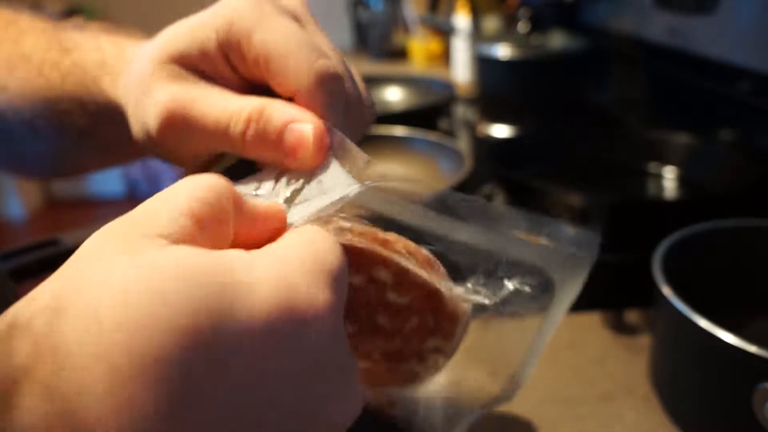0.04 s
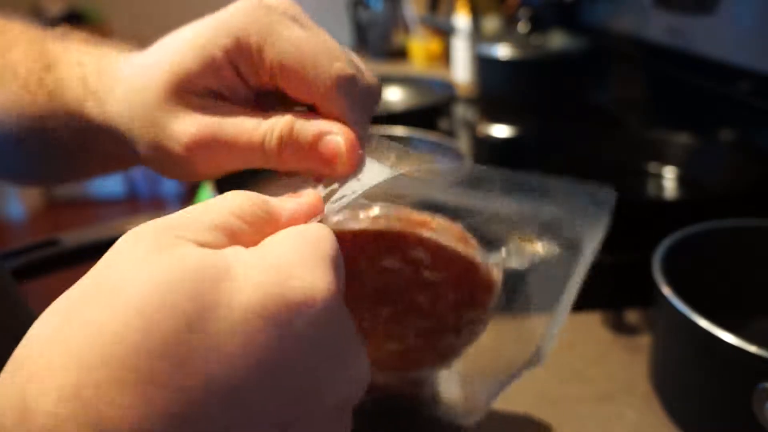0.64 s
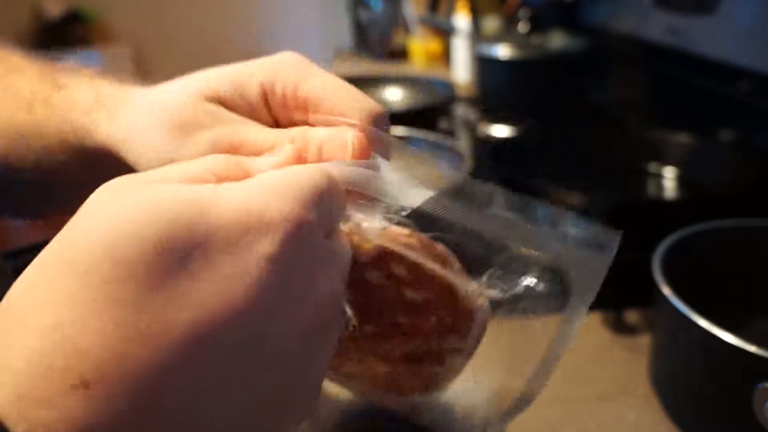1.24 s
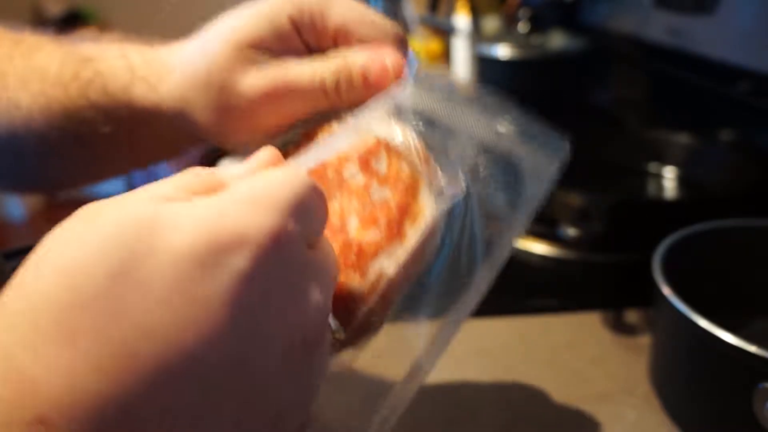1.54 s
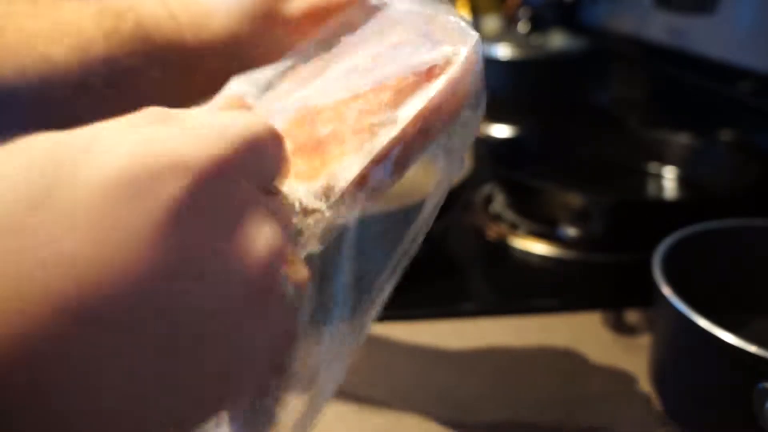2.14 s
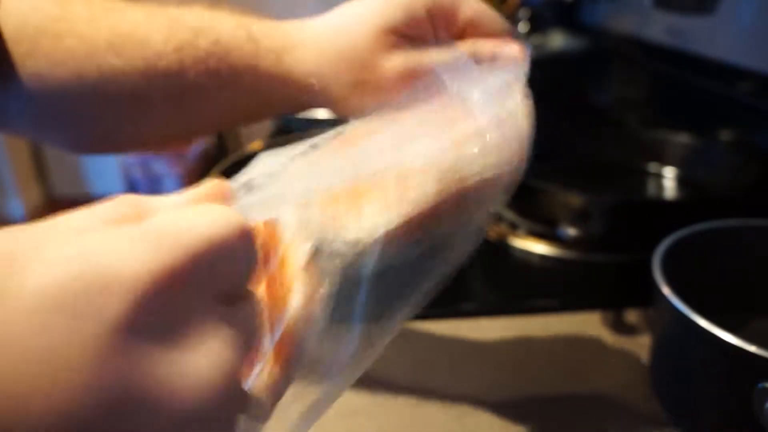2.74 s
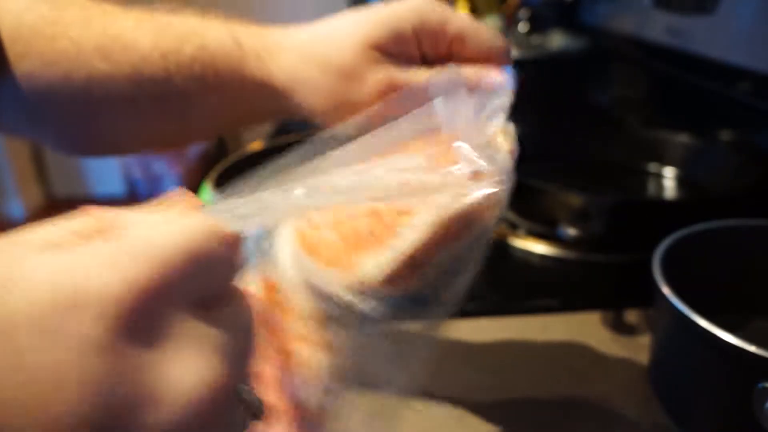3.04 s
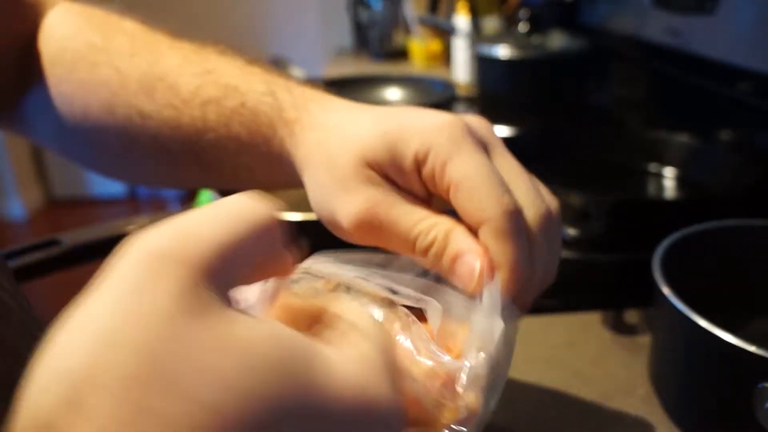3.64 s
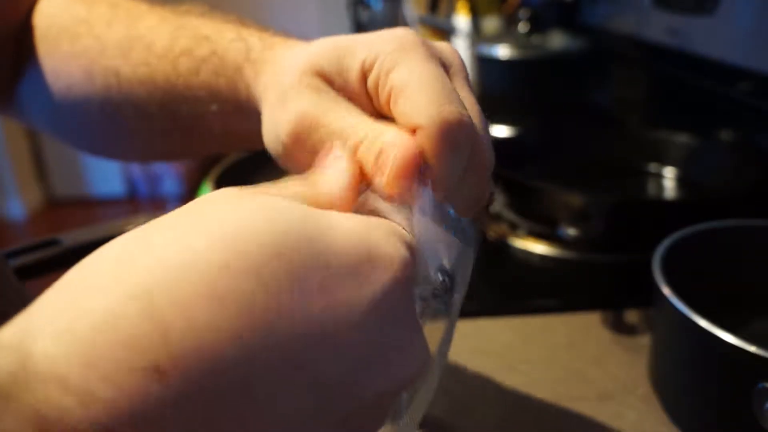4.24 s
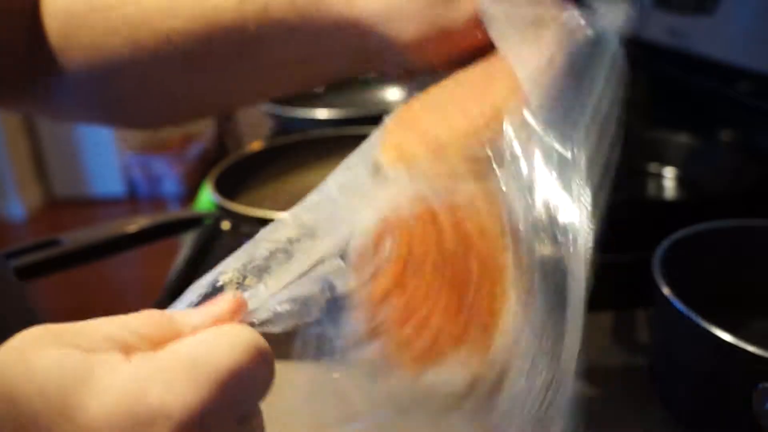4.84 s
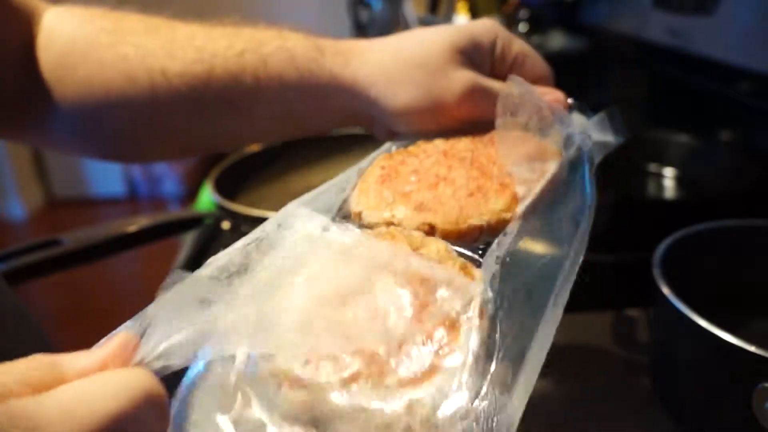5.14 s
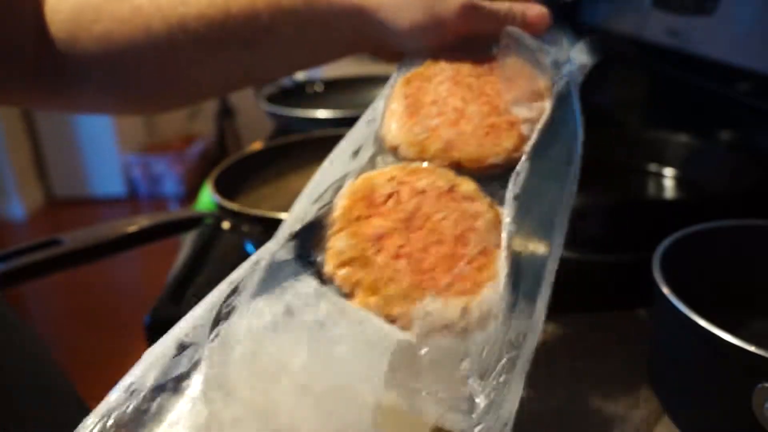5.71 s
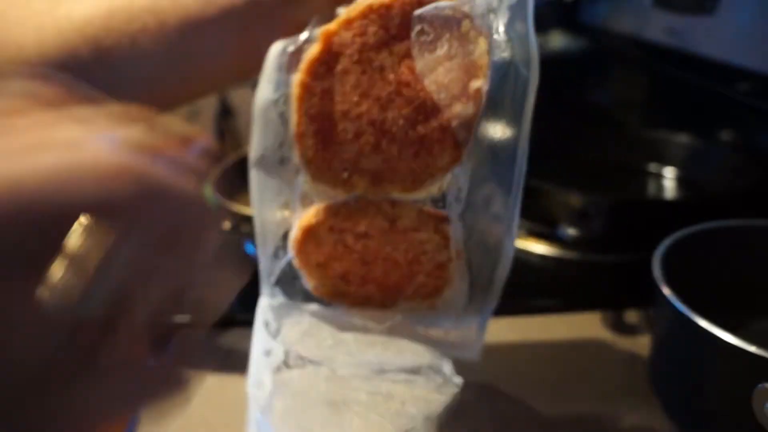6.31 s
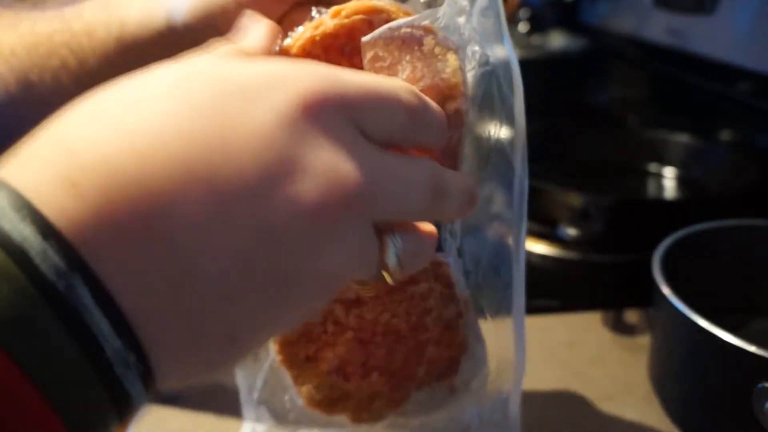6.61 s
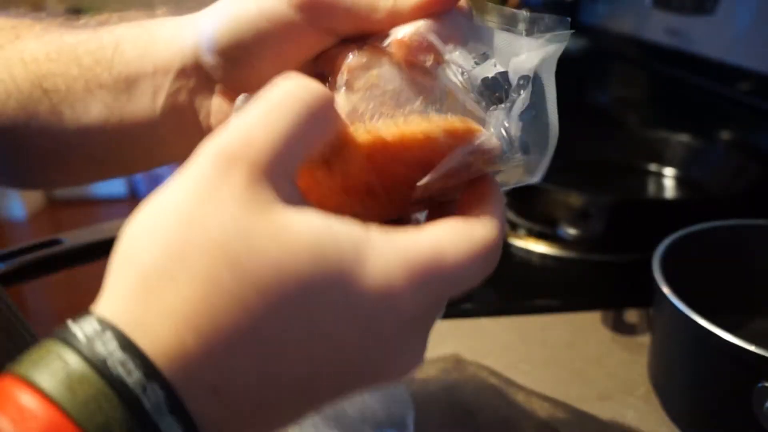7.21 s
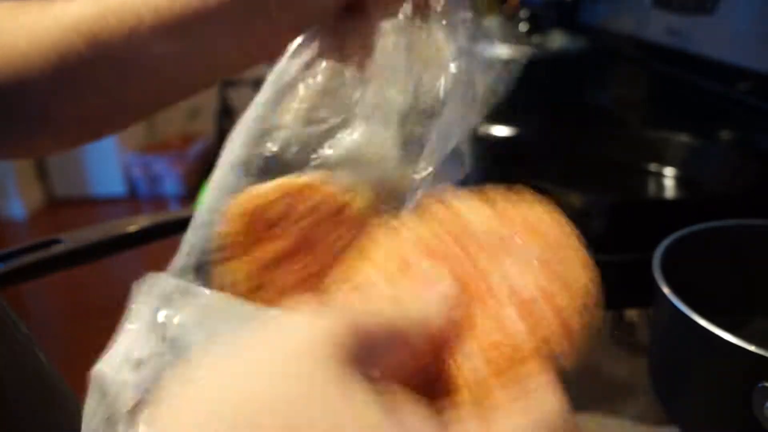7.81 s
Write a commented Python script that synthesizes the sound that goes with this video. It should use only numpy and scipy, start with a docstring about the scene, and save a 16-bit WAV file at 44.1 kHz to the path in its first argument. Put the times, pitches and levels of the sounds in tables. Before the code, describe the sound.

Thin plastic crackles close to the microphone as hands peel open a bag of frozen patties. From the start until about 4.5 seconds, uneven pulls stir up dense rustling, with sharp crease snaps, small ticks and short crunches of collapsing folds. The patties bump softly in the first second, and give a clearer dull knock at 3.2 seconds. Around 4.8 seconds the seal tears with a very short rip that falls in pitch. From about 5.3 to 5.8 seconds a loose flap slides over the bag in two rasping scrapes. The crinkling turns lighter and sparser from 6 seconds, with a couple of soft bumps near 6.6. It builds again from 7.3 to 8 seconds, with loud snaps and two more dull knocks. The small kitchen adds a brief echo, with quiet room air and a faint appliance hum underneath.

```python
"""Crackling, snapping plastic, close up: hands peel open a bag of frozen patties in a small kitchen.
Each pull stirs the film into a rustle of tiny buckles that dies away; folds collapse and creases snap.
The seal rips and a loose flap slides over the bag, both by stick-slip; the hard patties bump softly.
The room answers briefly over a faint appliance hum."""
import sys
import numpy as np
from scipy import signal
from scipy.fft import rfft, irfft, next_fast_len
from scipy.io import wavfile
from scipy.ndimage import uniform_filter1d, map_coordinates

SR = 44100
rng = np.random.default_rng(int(sys.argv[2]) if len(sys.argv) > 2 else 0)


def waveform_to_disk(signal):
    """Save audio, clipped to [-1, 1], as 16-bit WAV at the path in sys.argv[1]."""
    frames = np.transpose(np.atleast_2d(signal))
    scaled = np.clip(frames, -1, 1) * 32767
    samples = np.round(scaled).astype(np.int16)
    wavfile.write(sys.argv[1], SR, samples)


N = 355622
TOP_HZ = 16000

# folds collapsing or peeling apart: start_s, length_s, crumple_db, crackle_db
COLLAPSES = [(0.0, .02, -29, -36.5), (0.402, 0.032, -28.5, -37), (0.779, .072, -22.5, -28),
             (1.447, 0.025, -21.5, -28.5), (2.006, 0.096, -24, -29.5), (2.323, 0.026, -26.5, -21.5),
             (2.79, 0.02, -29, -32), (3.209, 0.013, -20.5, -30), (4.461, 0.04, -22, -25.5),
             (4.778, 0.02, -22.5, -24.5), (4.826, 0.027, -27, -30.5), (4.998, 0.014, -26, -32),
             (7.314, 0.035, -24.5, -29), (7.858, 0.032, -26, -29.5), (7.92, 0.034, -27, -33.5)]
# fingers and patties rubbing slack film: start_s, length_s, level_db
FILM_RUBS = [(1.056, 0.056, -33), (5.16, 0.067, -39.5), (5.339, 0.15, -34), (6.657, 0.077, -33),
             (7.548, 0.2, -37)]

def crinkle(stir):
    """Facets buckle singly under a light touch; a collapsing fold sets off an avalanche of them."""
    drive = stir * amp([[1.5], [0]])
    for start_s, length_s, crumple_db, crackle_db in COLLAPSES:
        avalanche = stroke(length_s, attack_s=.004, t60_s=.025)
        add(drive, start_s, amp([[crumple_db], [crackle_db]]) * avalanche)
    t = np.arange(SR // 3) / SR
    rubbing = np.zeros((1, N))
    for start_s, length_s, level_db in FILM_RUBS:
        add(rubbing, start_s, amp([[level_db]]) * np.sin(np.pi * np.minimum(t / length_s, 1)))
    sparse = 1 / (1 + drive[0] / amp(-21))  # under force the buckles are more alike, so they merge
    body, crisp = drive * amp(1.5 * wobble(60))
    folds = buckles(3000, centre_hz=401, spread_oct=.6, cycles=1.64, scatter_db=2 * sparse, size=700)
    crumple = buckles(7500, centre_hz=1674, spread_oct=.852, cycles=3.3, scatter_db=6.5 * sparse, size=420)
    crackle = buckles(7000, centre_hz=6400, spread_oct=.806, cycles=1.1, scatter_db=5.2 * sparse, size=48)
    return body * crumple + (amp(-11) * body + rubbing) * folds + crisp * crackle


def buckles(count, centre_hz, spread_oct, cycles, scatter_db, size):
    """Tiny damped rings, each of its own pitch, strength and direction; mid and side of even level."""
    start = rng.integers(N, size=count)
    pitch, strength, facing = rng.standard_normal((count, 3)).T
    hz = centre_hz * 2 ** (spread_oct * pitch)
    push = amp(scatter_db[start] * strength) * np.sqrt(hz) * (hz < TOP_HZ) * rng.choice([-1, 1], count)
    turns = np.float32(hz[:, None] / SR) * np.arange(size, dtype=np.float32)
    rings = push[:, None] * np.sin(2 * np.pi * turns) * np.exp(-turns / float(cycles))
    where = (start[:, None] + np.arange(size)).ravel()
    mid_side = np.array([np.bincount(where, r.ravel(), N)[:N] for r in (rings, rings * facing[:, None])])
    power = uniform_filter1d(uniform_filter1d(mid_side ** 2, size=1100), size=1100)
    return mid_side / np.sqrt(np.abs(power) + 1e-6)


# hands pulling the film: start_s, length_s, crumple_db, crackle_db
HAND_PULLS = [(0.15, .16, -42, -46.5), (0.718, .04, -46, -35), (0.899, .14, -33, -61),
              (1.141, .18, -43, -50.5), (1.529, .11, -32, -39), (2.422, .28, -45, -43),
              (2.774, .13, -34.5, -37.5), (3.189, .025, -36, -38.5), (3.276, .25, -39, -46),
              (3.679, .06, -33, -41.5), (3.798, .38, -39.5, -46.5), (4.36, .08, -40, -44.5),
              (4.907, .11, -34.5, -42), (5.6, .18, -37, -44), (5.959, .22, -46, -49), (6.322, .1, -45, -49),
              (6.58, .07, -41, -47.5), (7.059, .16, -39.5, -43.5), (7.35, .08, -34.5, -40.5),
              (7.569, .46, -37, -43)]

def film_stir():
    """Crumple and crackle envelopes: each pull, collapse and big snap stirs the film, which settles."""
    held_db, settle_db, grip_s = -64, -12.5, .023
    power = np.full((2, N), amp(held_db) ** 2)
    for start_s, length_s, crumple_db, crackle_db in HAND_PULLS:
        pull = stroke(length_s, grip_s, t60_s=.35)
        add(power, start_s, (amp([[crumple_db], [crackle_db]]) * pull) ** 2)
    for start_s, length_s, crumple_db, crackle_db in COLLAPSES:
        settling = amp(settle_db) * stroke(length_s, grip_s, t60_s=.65)
        add(power, start_s, (amp([[crumple_db], [crackle_db]]) * settling) ** 2)
    for start_s, ring_db, _, crack_db in BIG_SNAPS:
        unrest = stroke(0, attack_s=.0033, t60_s=.2)
        add(power, start_s, (amp([[ring_db - 10.5], [crack_db - 6]]) * unrest) ** 2)
    return np.sqrt(power)


# loudest creases snapping through: start_s, ring_db, pitch_hz, crack_db
BIG_SNAPS = [(0.036, -27.0, 2970, -30), (0.1726, -35.5, 770, -45), (0.3754, -36.0, 640, -46),
             (0.3963, -32.5, 4700, -51), (0.438, -33.0, 2440, -35.5), (0.5128, -31.5, 2730, -35),
             (0.5428, -28.0, 1840, -41.5), (0.5987, -29, 2000, -32.5), (0.9365, -27, 1590, -31.5),
             (1.0034, -28.5, 1570, -33), (1.1286, -30.5, 3740, -37.5), (1.1665, -30.5, 2850, -36.5),
             (1.4091, -33.5, 2900, -38.5), (1.4901, -28, 1030, -36), (1.687, -29.5, 620, -34),
             (1.8117, -26, 1280, -29.5), (1.9294, -37, 2100, -41.0), (2.014, -31, 2340, -30),
             (2.1583, -34.5, 2300, -32.5), (2.212, -35.0, 1910, -50), (2.2684, -31.0, 1850, -35.5),
             (2.3145, -37, 1780, -34.5), (2.4417, -28, 1470, -30), (2.7296, -33.0, 1250, -31.5),
             (2.783, -29, 2020, -29), (2.8474, -27.5, 1620, -44), (3.153, -38.5, 1570, -42.5),
             (3.361, -36, 3730, -44), (3.4162, -27, 1640, -35), (3.4686, -32.0, 1420, -37),
             (3.5355, -36, 1590, -40.5), (3.719, -30.5, 1280, -32), (3.8064, -25.5, 1800, -33),
             (3.859, -29.5, 1690, -39), (3.9572, -31.5, 2260, -33.5), (4.0238, -28.0, 2500, -32),
             (4.0826, -31.5, 1150, -37), (4.3444, -38, 1700, -45.5), (4.439, -28.0, 1520, -32),
             (4.54, -30.5, 1080, -35.5), (4.6285, -29, 1830, -32.5), (4.7285, -28.0, 1530, -30),
             (4.776, -26, 1050, -29), (5.5869, -33, 960, -34.5), (5.6768, -30.5, 2270, -32),
             (6.102, -37, 1140, -67), (6.141, -34.5, 1160, -47), (6.1694, -36.5, 2040, -55),
             (6.253, -40.0, 1890, -44), (6.4112, -35.5, 2110, -46.5), (6.586, -30.0, 1650, -36.5),
             (6.7009, -32.5, 1570, -37.5), (6.907, -44, 1750, -49), (6.9696, -38.0, 1810, -46.5),
             (7.19, -34.5, 1900, -53), (7.2944, -28, 1000, -32), (7.4426, -33.0, 3700, -34),
             (7.5684, -32.5, 1380, -36), (7.7159, -27.0, 1520, -30.5), (7.7487, -26, 1600, -33.5),
             (7.8674, -25, 1540, -30.5)]
# taut film ticking under the fingertips: start_s, level_db
FINGER_TICKS = [(0.1275, -31.5), (0.2482, -38), (1.155, -36), (1.301, -48.5), (1.726, -36.5), (1.8643, -39),
                (1.9887, -33.5), (2.3838, -34), (2.536, -35), (2.637, -37), (3.0816, -38.5),
                (3.6408, -37.5), (4.159, -39), (5.028, -43), (5.201, -43.5), (6.18, -53), (6.225, -44),
                (6.3365, -53), (6.346, -47), (6.4396, -49), (6.8587, -46), (7.0057, -43), (7.067, -43),
                (7.168, -57), (7.552, -42), (7.651, -31), (7.691, -32)]

def creases(stir):
    """Big snaps, ticks, small snaps that come more often under hard handling, and a volley per fold."""
    out = np.zeros((2, N))
    for start_s, ring_db, pitch_hz, crack_db in BIG_SNAPS:
        add(out, start_s, snap(ring_db, pitch_hz, crack_db))
    for start_s, level_db in FINGER_TICKS:
        add(out, start_s, amp(level_db) * crack(centre_hz=7000))
    lowest_hz, range_oct, small_range_db = 688, 2.72, 14
    handling = np.cumsum(stir[0] ** .2)
    for moment, strength, pitch in rng.random(size=(520, 3)):
        i = np.searchsorted(handling, moment * handling[-1])
        ring_db, crack_db = 20 * np.log10(stir[:, i]) + [-12.5, -10] + small_range_db * strength ** 2
        add(out, i / SR, snap(ring_db, lowest_hz * 2 ** (range_oct * pitch), crack_db))
    volley_per_s, volley_range_db = 140, 7.5
    for start_s, length_s, crumple_db, crackle_db in COLLAPSES:
        count = int(np.ceil(length_s * volley_per_s))
        for k, (delay, strength, pitch) in enumerate(rng.random(size=(count, 3))):
            crease = snap(crumple_db - 18.5, lowest_hz * 2 ** (range_oct * pitch ** 2), crackle_db - 16)
            add(out, start_s + length_s * (k + delay) / count, amp(volley_range_db * strength) * crease)
    return out


def snap(ring_db, pitch_hz, crack_db):
    """A crease flips with one jolt and a dry crack; its facet shivers briefly in a broad resonance."""
    t = np.arange(SR // 20) / SR
    shiver = rng.standard_normal((2, len(t)))
    shiver[0, 0] = 1.35 * rng.choice([-1, 1])  # the jolt
    crack_hz = min(5950 * 2 ** (.22 * (crack_db - ring_db)), 13000)  # duller when weak against its ring
    facet = filtered(shiver * fade(t, .016), lambda f: resonance(f, pitch_hz, .75 * pitch_hz) ** 2)
    return amp(crack_db) * crack(crack_hz) + amp(ring_db) * np.array([unit(x) for x in facet])


def crack(centre_hz):
    """One sharp jolt and a faint scatter after it."""
    t = np.arange(SR // 20) / SR
    burst = rng.standard_normal((2, len(t))) * (fade(t, .004) + .19 * fade(t, .042))
    burst[0, 0] = 2.3 * rng.choice([-1, 1])
    band = filtered(burst, lambda f: resonance(f, centre_hz, 1.6 * centre_hz) ** 2)
    return np.array([unit(x) for x in band])


# flap sliding over the bag: time_s, level_db, resonance_hz
FLAP_SLIDE = [(5.345, -46, 850), (5.41, -24.5, 1140), (5.5, -81, 920), (5.57, -39.5, 870), (5.63, -23, 990),
              (5.663, -19, 1580), (5.697, -31.5, 2220), (5.733, -21.5, 2200), (5.755, -23.5, 1000),
              (5.776, -31, 860), (5.82, -83, 850)]
# seal ripping, pitch falling as the free film lengthens: time_s, level_db, resonance_hz
SEAL_RIP = [(4.815, -34, 9300), (4.85, -20.5, 4100), (4.862, -20.5, 2850), (4.9, -73, 3000)]

def scrape(path):
    """Stick-slip drives an air pocket and a film resonance that glides with tension and free length."""
    time_s, level_db, resonance_hz = np.transpose(path)
    t = time_s[0] + np.arange(SR // 2) / SR
    gain = amp(np.interp(t, time_s, level_db))
    glide_hz = np.interp(t, time_s, resonance_hz)
    slips = rng.standard_normal((2, len(t))) * amp(2 * wobble(300)[:len(t)])
    air_pocket = unit(filtered(slips, lambda f: resonance(f, hz=1040, width_hz=1100)))
    out = np.zeros((2, N))
    for hz in np.geomspace(700, 11200, 9):  # the glide crossfades half-octave bands
        share = np.clip(1 - 2 * np.abs(np.log2(glide_hz / hz)), 0, 1)
        ring = filtered(slips, lambda f: resonance(f, hz, .36 * hz) * resonance(f, hz, 3 * hz))
        add(out, time_s[0], gain * np.sqrt(share) * (unit(ring) + .33 * air_pocket))
    return out


# resonances of the half-open bag: centre_hz, width_hz, gain_db
BAG_MODES = [(360, 236, -4), (843, 104, -3.5), (1128, 207, 0.5), (1990, 510, -5.5)]
# film as a radiator: frequency_hz, gain_db
FILM_RADIATION = [(60, -14.5), (200, -13.5), (500, -3.5), (1500, -6.5), (3000, 0.5), (8000, 0),
                  (12000, 1.5), (16000, -3.5)]

def bag_response(f):
    """The radiating film and the bag's resonances colour the sounds of the plastic."""
    modes = sum(amp(db) * np.abs(resonance(f, hz, width_hz)) ** 2 for hz, width_hz, db in BAG_MODES)
    return minimum_phase(amp(along(FILM_RADIATION, f)) * (1 + modes))


# patties and knuckles bumping through the film: start_s, level_db, pitch_hz
PATTY_BUMPS = [(0.062, -24.5, 126.4), (0.43, -19, 324), (0.618, -22.5, 457), (3.21, -11.5, 352),
               (6.583, -24, 240), (6.705, -27.5, 260), (7.8, -17, 470), (7.883, -22.5, 196)]

def bumps():
    """Dull knocks of frozen meat, cushioned by the hands, with a low thud under each."""
    out, t = np.zeros((2, N)), np.arange(SR // 6) / SR
    for start_s, level_db, hz in PATTY_BUMPS:
        push = rng.standard_normal((2, len(t))) * fade(t, 24 / hz) * (1 - np.exp(-t / .0021))
        knock = filtered(push, lambda f: resonance(f, hz, 1.37 * hz) ** 2
                         + .53 * resonance(f, 130, 130) ** 2)
        add(out, start_s, amp(level_db - 21.5) * unit(knock))
    return out


# kitchen reverberation: frequency_hz, t60_s
KITCHEN_DECAY = [(200, 0.36), (2000, 0.4), (12000, 0.28)]

def kitchen(source):
    """A short, diffuse echo off counter, stove and walls, with a fresh random tail every quarter second."""
    out, step, delay_s = np.zeros((2, N)), SR // 4, .003
    starts = range(0, N, step)
    hz, t, noise = signal.stft(rng.standard_normal((len(starts), 2, step)), SR, nperseg=256)
    tails = signal.istft(noise * fade(t, along(KITCHEN_DECAY, hz)[:, None]), SR, nperseg=256)[1]
    for start, tail in zip(starts, tails):
        echo = signal.fftconvolve(source[:1, start:start + step], tail / np.linalg.norm(tail[0]), axes=1)
        add(out, start / SR + delay_s, echo)
    return out


# room air spectrum: frequency_hz, density_db
ROOM_AIR = [(25, -30), (60, -22.5), (120, -9), (220, -8.5), (500, -10.5), (1200, -11), (4000, -19),
            (16000, -42)]

def background():
    """Quiet room air and an appliance's mains hum."""
    air = unit(filtered(rng.standard_normal((2, N)), lambda f: amp(along(ROOM_AIR, f))))
    hum = np.sin(2 * np.pi * 120 * np.arange(N) / SR)
    return amp(-50) * air + amp(-64) * hum


def amp(db):
    """Decibels to gain."""
    return 10 ** (np.asarray(db) / 20)


def unit(x):
    """Scale to rms 1."""
    return x / np.sqrt(np.mean(x ** 2) + 1e-20)


def along(points, hz):
    """Read (frequency_hz, value) points on a log axis."""
    f, values = np.transpose(points)
    return np.interp(np.log(hz + 1), np.log(f), values)


def wobble(knots_per_s):
    """A smooth random curve."""
    knots = rng.standard_normal(int(N * knots_per_s / SR) + 4)
    return map_coordinates(knots, [np.arange(N) * knots_per_s / SR])


def filtered(x, response):
    """Apply a complex frequency response."""
    size = x.shape[-1]
    padded = 2 * next_fast_len(size // 2 + 2048)
    return irfft(rfft(x, padded) * response(np.fft.rfftfreq(padded, 1 / SR)), padded)[..., :size]


def minimum_phase(gain):
    """The causal response with this gain and the least delay."""
    cepstrum = irfft(np.log(gain + 1e-6))
    half = len(cepstrum) // 2
    cepstrum[1:half] *= 2
    cepstrum[half + 1:] = 0
    return np.exp(rfft(cepstrum))


def resonance(f, hz, width_hz):
    """Response of one damped mode."""
    return 1j * f * width_hz / (hz * hz - f * f + 1j * f * width_hz)


def fade(t, t60_s):
    """Exponential decay, 60 dB in t60_s."""
    return np.exp(-np.log(1000) * t / t60_s)


def stroke(length_s, attack_s, t60_s):
    """Envelope that rises, holds until length_s and dies away."""
    t = np.arange(SR) / SR
    return np.minimum(t / attack_s, 1) * fade(np.maximum(t - length_s, 0), t60_s)


def add(track, start_s, sound):
    """Mix a sound into the track, row for row."""
    part = track[:, max(round(start_s * SR), 0):][:, :sound.shape[1]]
    part += sound[:, :part.shape[1]]


# stereo width: frequency_hz, side_gain_db
STEREO_WIDTH = [(100, -24), (400, -17), (1000, -13), (2000, -5), (4000, -3), (7000, 1.5), (13000, -3)]

def scene():
    """The bag in the kitchen; left and right agree in the bass and differ in the treble."""
    stir = film_stir()
    film = crinkle(stir) + creases(stir) + scrape(FLAP_SLIDE) + scrape(SEAL_RIP)
    bag = filtered(film, bag_response) + bumps()
    mid, side = bag + amp(-6.5) * kitchen(bag) + background()
    side = filtered(side, lambda f: minimum_phase(amp(along(STEREO_WIDTH, f))))
    return np.array([mid + side, mid - side]) * amp([[-1], [0]])


def record(dry):
    """The camera rounds off the highest peaks and cuts steeply at TOP_HZ; the deepest bass is thinned."""
    ceiling, low_cut_hz = .85, 45
    rounded = dry / (1 + (dry / ceiling) ** 8) ** (1 / 8)
    low_cut = lambda f: (1j * f / (1j * f + low_cut_hz)) ** 2
    high_cut = lambda f: 1 / (1 + (f / TOP_HZ) ** 120)
    return filtered(rounded, lambda f: low_cut(f) * high_cut(f))


dry = scene()
out = record(dry)
waveform_to_disk(out)
```